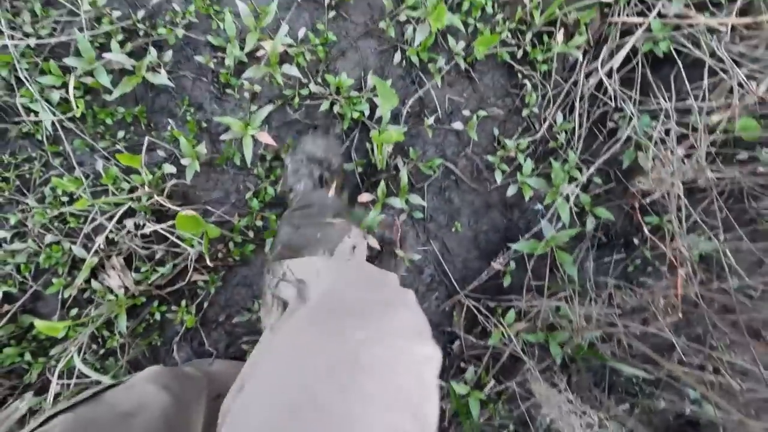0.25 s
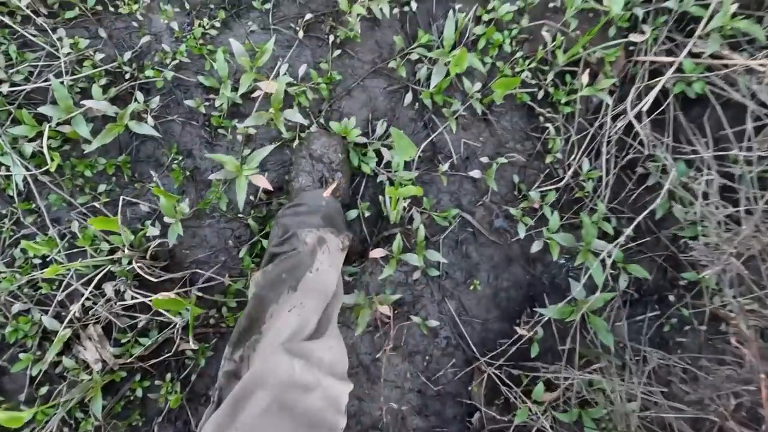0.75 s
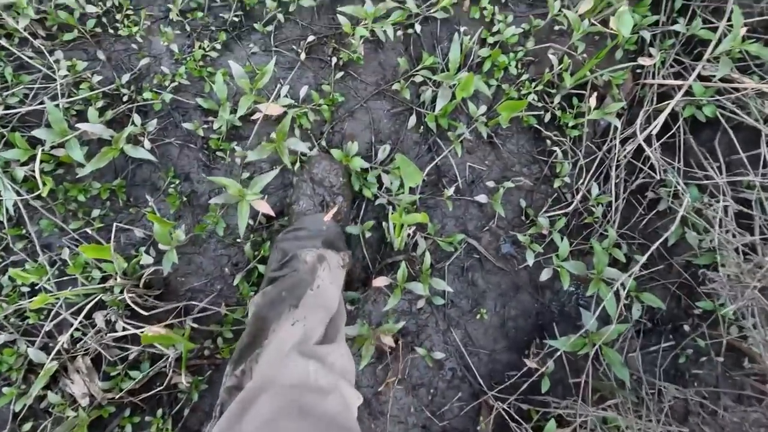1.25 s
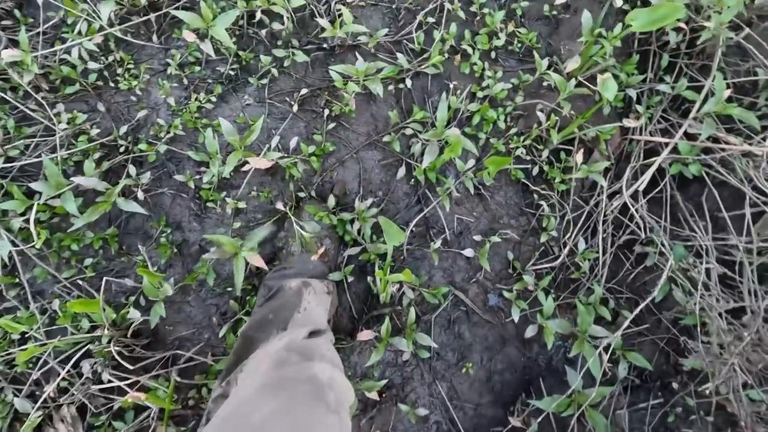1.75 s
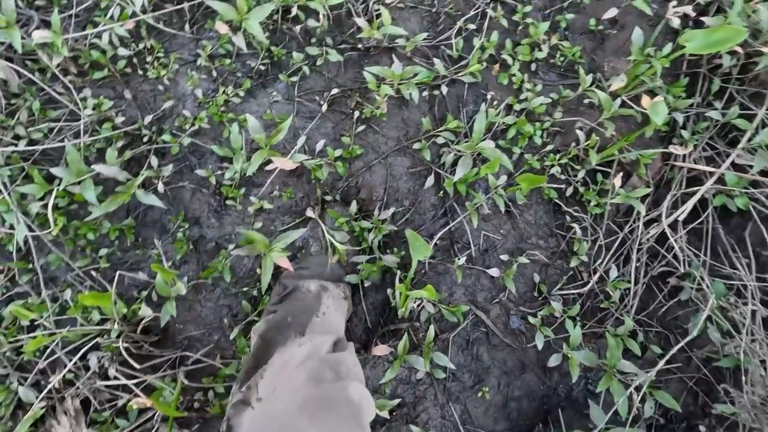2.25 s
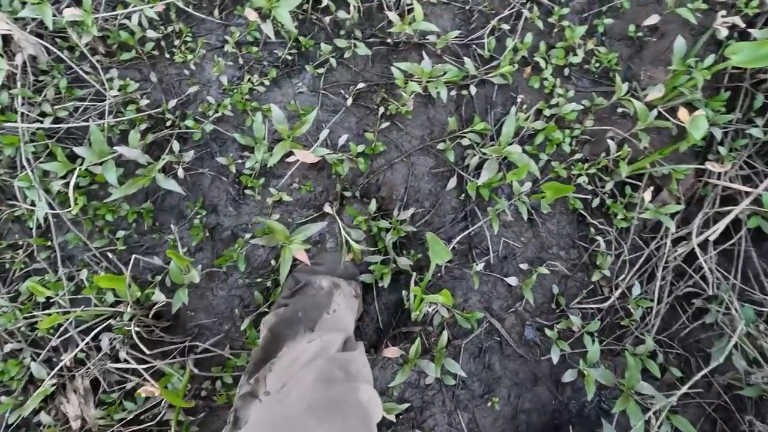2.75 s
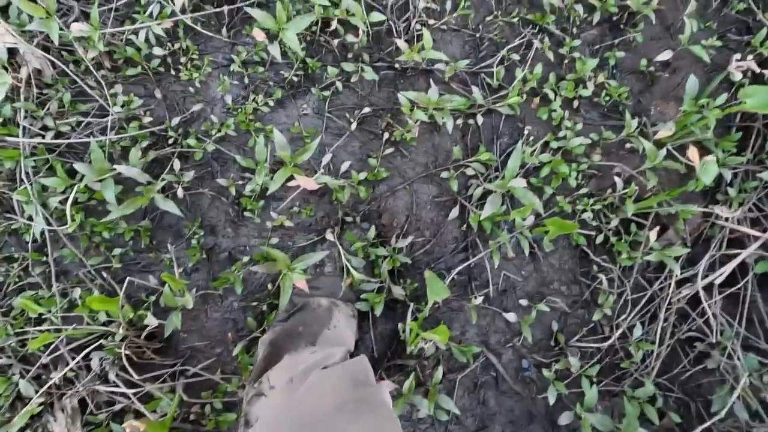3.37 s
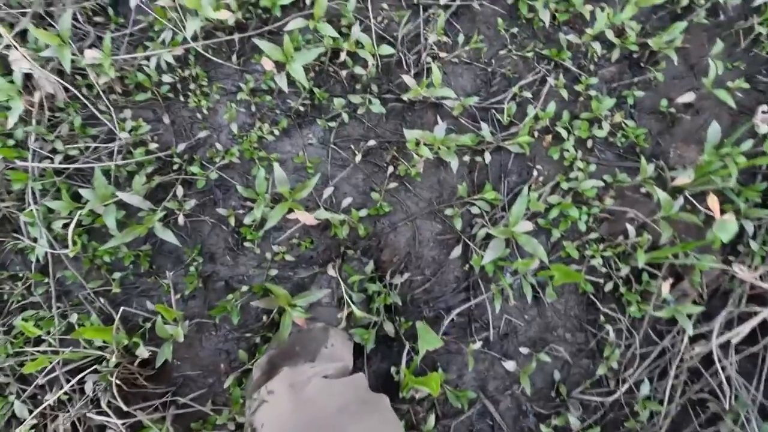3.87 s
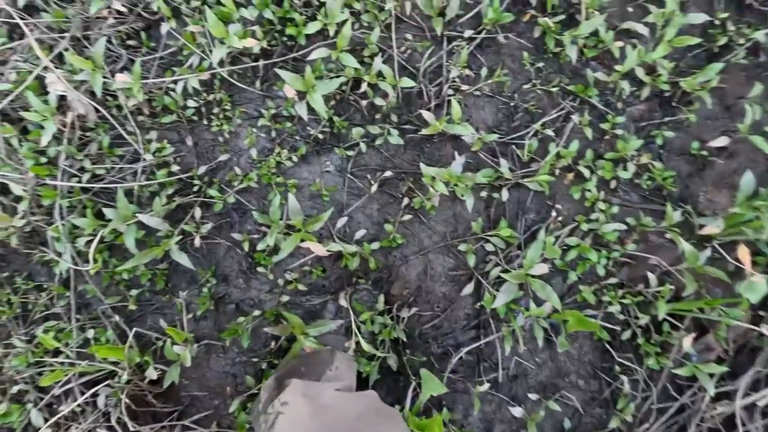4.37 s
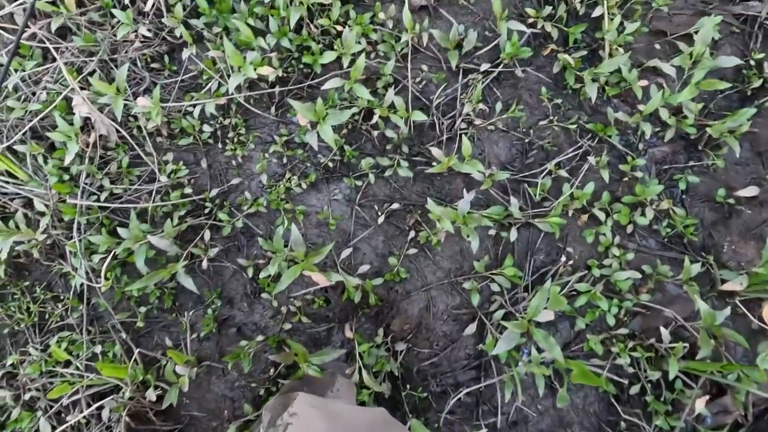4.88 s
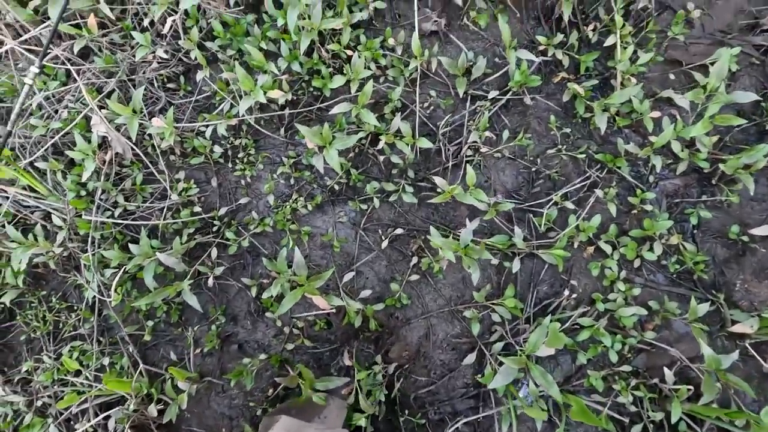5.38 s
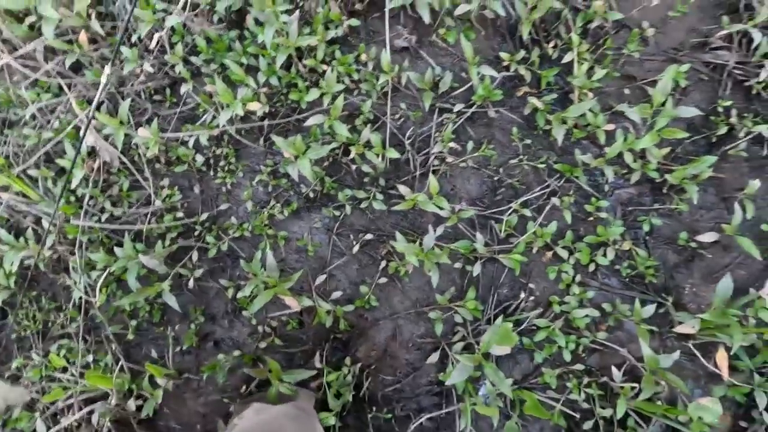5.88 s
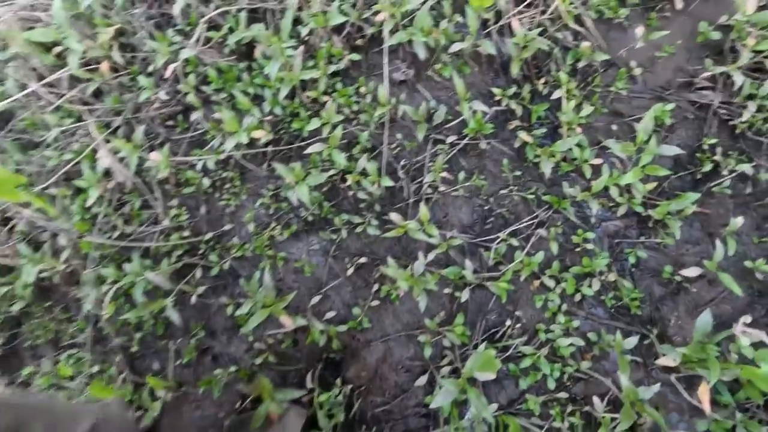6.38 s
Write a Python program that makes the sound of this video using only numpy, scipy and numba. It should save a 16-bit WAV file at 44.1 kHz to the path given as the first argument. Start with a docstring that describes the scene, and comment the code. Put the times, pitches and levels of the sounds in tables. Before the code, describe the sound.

Outdoors in a marsh, a boot presses into wet mud. After a near-quiet start, a burst of squelchy pops gives way to crackling bubbles and snapping stems. A short sharp squelch comes just after three seconds, then sparse pops and gurgles. Low wind buffeting and a wavering hum lie behind, with dull hand bumps on the handheld stereo phone.

```python
"""Wet marsh mud squelches and crackles under a slowly sinking boot: swarms of decaying sines and
pulsed band noise follow the load; runs of grains make squelching slips, gurgles and an airy rustle.
Single pockets pop, chirp and plop as sines of rising pitch; stems snap as clusters of short rings.
Behind them wind buffets two microphone ports as shaped noise, a low hum of narrow-band noise
wavers, and the hand bumps the phone as brief low cosines under a swelling envelope."""
import sys
import numpy as np
from scipy import signal
from scipy.fft import rfft, irfft
from scipy.io import wavfile
from scipy.ndimage import uniform_filter1d
from numba import njit

SR = 44100
rng = np.random.default_rng(int(sys.argv[2]) if len(sys.argv) > 2 else 0)


def bounce(signal):
    """Save signal as a 16-bit WAV file at the path given by the first command-line argument."""
    frames = np.transpose(np.atleast_2d(signal))
    limited = np.clip(frames, -1, 1)
    pcm = np.round(limited * 32767).astype(np.int16)
    wavfile.write(sys.argv[1], SR, pcm)


N = 292852

# All levels are those before the microphone response.
# Load on the mud, as the gain of the squelch: t/s, level/dB
MUD_LOAD = [(0, -60), (.3, -59), (.76, -43), (1.1, -49), (1.25, -51), (1.75, -50.5), (2.25, -55),
            (2.42, -58.5), (2.7, -57.5), (3.05, -56), (3.12, -38), (3.26, -50), (3.6, -57.5), (4.25, -56),
            (4.5, -54), (5.7, -54.5), (6.1, -57.5), (6.45, -54), (6.64, -52.5)]
# Runs of grains around one pitch (squelching slips, low gurgles and one airy rustle):
# t/s, length/s, level/dB, middle f/Hz, spread (+-)/octaves
GRAIN_RUNS = [(0.292, 0.44, -54, 507, 0.24), (0.631, 0.035, -40, 1820, 0.74),
              (0.752, 0.11, -41.5, 1500, 0.83), (0.845, 0.053, -30.5, 1620, 0.45),
              (0.887, 0.08, -38.5, 1126, 0.46), (1.199, 0.16, -48, 5630, 0.62),
              (1.698, 0.29, -61, 384, 0.62), (2.458, 0.017, -39, 1940, 1.54),
              (2.756, 0.053, -43, 2450, 1.95), (3.066, 0.025, -36, 1695, 1.59),
              (3.128, 0.02, -34, 2570, 2.3), (3.153, 0.12, -45.5, 4300, 0.98),
              (3.171, 0.025, -46.5, 637, 0.48), (3.537, 0.21, -52, 294, 0.21),
              (3.618, 0.36, -57.5, 9700, 0.3), (4.025, 0.71, -58, 346, 0.26),
              (5.605, 0.014, -39, 1190, 1.1), (5.645, 0.029, -42, 1670, 0.63),
              (5.801, 0.12, -52.5, 370, 0.23), (6.122, 0.05, -43.5, 1120, 0.35),
              (6.203, 0.083, -50, 328, 0.2), (6.331, 0.13, -47.5, 2970, 1.69),
              (6.429, 0.17, -50.5, 4840, 1.46)]
# Popping air pockets: t/s, level before the onset is shaped/dB, starting f/Hz
AIR_POPS = [(0.484, -29, 2240), (0.557, -24.5, 2360), (0.648, -25.5, 2500), (0.702, -20, 2450),
            (0.8, -21, 1290), (0.835, -20, 1880), (0.849, -22, 1060), (0.861, -14, 1200), (0.87, -19, 1820),
            (0.879, -16, 1220), (1.078, -20, 1300), (1.015, -33, 1800), (1.147, -25, 880),
            (1.185, -22, 3840), (1.226, -28, 4100), (1.32, -19.5, 5300), (1.35, -19.5, 3080),
            (1.406, -27, 1700), (1.499, -31, 5050), (1.555, -19, 4350), (1.631, -25.5, 3640),
            (1.733, -27.5, 2300), (1.782, -25, 4470), (1.803, -25.5, 3650), (1.812, -17, 6640),
            (1.823, -24.5, 2430), (1.873, -30.5, 3400), (1.929, -29.5, 2560), (1.985, -18, 2400),
            (2.108, -28, 2150), (2.466, -17, 1105), (2.566, -32, 1210), (2.757, -36, 880),
            (2.843, -32.5, 3540), (3.026, -31, 4770), (3.032, -31, 1260), (3.07, -15.5, 630),
            (3.129, -22.5, 970), (3.144, -20.5, 1100), (3.327, -32, 5900), (3.856, -35, 7150),
            (4.317, -31, 2660), (4.334, -32.5, 4840), (4.458, -32.5, 2900), (4.513, -34.5, 3430),
            (4.561, -30.5, 2070), (4.598, -27.5, 2300), (4.658, -29, 3970), (4.766, -32.5, 3620),
            (4.778, -31.5, 2470), (4.899, -20.5, 1050), (4.925, -30.5, 4040), (4.999, -32.5, 2180),
            (5.11, -23.5, 2380), (5.16, -34, 2540), (5.212, -32, 2420), (5.23, -27.5, 2360),
            (5.371, -30, 2000), (5.609, -26, 960), (5.616, -21, 1310), (5.638, -32, 1780),
            (5.689, -28.5, 4220), (5.815, -30.5, 2890), (5.85, -30.5, 4530), (6.296, -27, 2520),
            (6.336, -17, 1690), (6.446, -32.5, 2360), (6.466, -31, 2230)]
# Chirps and plops of single pockets, three high and three low:
# t/s, level before the onset is shaped/dB, starting f/Hz, decay/cycles, pitch climb/1
CHIRPS_AND_PLOPS = [(1.162, -19.5, 1380, 2, 0.53), (1.193, -27, 820, 6.4, 0.4),
                    (2.161, -36.5, 1780, 16, 0.32), (3.23, -33.5, 358, 2.4, 0.04),
                    (3.536, -32, 335, 2.2, 0.07), (6.418, -37, 340, 2.7, 0.054)]
# Snapping dry stems: t/s, level of the earliest splinters before the onset is shaped/dB
STEM_SNAPS = [(0.486, -40), (0.799, -41), (0.835, -40), (1.185, -27), (1.316, -33.5), (1.349, -20),
              (1.478, -32.5), (1.556, -33), (1.812, -25.5), (2.464, -32.5), (2.76, -33.5), (3.071, -27),
              (3.131, -22.5), (4.899, -26.5), (4.922, -42), (5.113, -37.5), (5.616, -35.5), (5.637, -31)]
# Bumps of the hand: t of the crest/s, level midway between the ports/dB, f/Hz, length/s
HAND_BUMPS = [(0.692, -38, 50, 0.071), (3.692, -29.5, 75.7, 0.061), (3.696, -22.5, 149, 0.014),
              (4.12, -36, 88.3, 0.06), (4.729, -32.5, 84, 0.019), (4.994, -31, 76, 0.011),
              (5.888, -33.5, 60.4, 0.024), (6.256, -28, 74.5, 0.016)]
# Gust strength, as the gain of the buffeting: t/s, level/dB
GUST_LEVEL = [(0, -46), (.5, -49.5), (1.4, -48.5), (2.3, -46.5), (3.2, -48.5), (4.1, -44), (4.8, -50),
              (6, -47.5), (6.64, -50.5)]
# Relative spectral density of the buffeting: f/Hz, level/dB (per Hz)
BUFFET_SPECTRUM = [(18, -16), (28, 10), (70, -5.5), (160, -5), (230, -13), (320, -26.5), (640, -27),
                   (1200, -51.5)]
# Gain of the hum: t/s, level/dB
HUM_LEVEL = [(0, -50), (1.14, -58.5), (1.5, -47.5), (1.9, -53), (2.65, -46.5), (3.6, -48), (3.98, -50.5),
             (4.2, -52.5), (4.9, -47), (5.9, -48.5), (6.64, -59.5)]
# Response of the microphone ports: f/Hz, level/dB
MIC_RESPONSE = [(300, 1.5), (800, -9), (1100, -5), (2200, -6.5), (4000, -2.5), (5300, -5.5), (7300, 3),
                (8900, -5.5), (11000, 1.5), (13500, -8), (16000, -20)]

# crackle gain at a squelch gain of -53 dB; dB of crackle per dB of squelch
CRACKLE_DB, CRACKLE_FOLLOWS = -62.5, 0.74
CRACKLE_CYCLES = 5.0  # decay in cycles, scaled grain by grain
DROPLET_DB, DROPLET_CYCLES = 1.5, 9.0  # level over the crackle grains; mean decay in cycles
RUN_GROWTH_DB = 1.5  # rise in level along a run
# decay of a 1 kHz pop at -30 dB in cycles; its power of pitch; its change with level
POP_CYCLES, CYCLES_PITCH_POWER, CYCLES_DB_PER_DB = 2.03, 0.57, -0.02
SPLINTER_S, SPLINTER_FADE_DB = 0.012, 8  # longest main delay; fade of the latest
TICK_DB, TICK_SPREAD_DB = -5.5, 1.5  # random twig ticks: level over the squelch gain, scatter
BUMP_RISE, BUMP_FALL = 0.28, 1.1  # shares of the length before and after the crest
HUM_HZ, HUM_WIDTH_HZ = 88.7, 9.0
PORT_LAG = 0.5  # samples by which the left port hears late
TOP_HZ = 16700


def mud():
    """Superposition: low pockets, high leaf crackle and droplets share gains set by the load."""
    squelch_db, = curves(MUD_LOAD)
    crackle_db = CRACKLE_DB + CRACKLE_FOLLOWS * (squelch_db + 53.0)
    squeeze = spurts(70, 0.003)  # drives low and high pores together
    pockets = swarm(count=2600, low_hz=898, high_hz=4080, spread_db=5.0, cycles=1.55, glide=0.047)
    low_ooze = seep(593, bands=5, shared=squeeze, shared_db=0.9, own_db=3.1, side=0.12)
    squelch = pockets + undb(-3.5) * low_ooze
    leaves = swarm(count=3500, low_hz=3130, high_hz=13640, spread_db=6.0,
                   cycles=CRACKLE_CYCLES, glide=0.0)
    high_ooze = seep(3370, bands=4, shared=squeeze, shared_db=14.0, own_db=0.99, side=0.12)
    crackle = leaves + undb(2.5) * high_ooze + undb(DROPLET_DB) * droplets()
    return undb(squelch_db) * squelch + undb(crackle_db) * crackle


def swarm(count, low_hz, high_hz, spread_db, cycles, glide):
    """Many independent grains add to a dense texture, mostly small, with a few large."""
    when, pitch, size, pan, decay = rng.random((count, 5)).T
    size_db = -spread_db * np.log(1.008 - size)
    pan_db = 0.34 + 17.0 * (2 * pan - 1)
    hz = low_hz * (high_hz / low_hz) ** pitch
    return unit(grains(when * N / SR, hz, size_db, pan_db, cycles * (0.29 + 2 * decay ** 3), glide))


def seep(low_hz, bands, shared, shared_db, own_db, side):
    """Amplitude modulation: water in pores hisses in half-octave bands, spurting together and alone."""
    out = 0
    for hz in low_hz * 2 ** (np.arange(bands) / 2):
        sos = signal.butter(2, (hz, hz * np.sqrt(2)), "bandpass", fs=SR, output="sos")
        mid, across = signal.sosfilt(sos, rng.standard_normal((2, N))) / np.sqrt(hz)
        flow = 1 + undb(shared_db) * shared + undb(own_db) * spurts(60, 0.012)
        out = out + flow * (mid + side * across * np.array([[1], [-1]]))
    return unit(out)


def spurts(rate, trail_s):
    """Impulses at random times excite an exponential relaxation: a fast start and a slow trail."""
    kicks = (rng.random(N) < rate / SR) * rng.exponential(size=N)
    return signal.lfilter([1], [1, -np.exp(-1 / (trail_s * SR))], kicks)


def droplets(count=600):
    """Lightly damped resonance: lone bubbles of like size ring clearly and glide upward."""
    when, pitch, size, pan, decay = rng.random((count, 5)).T
    size_db = -3 * np.log(1.03 - size)
    pan_db = 1 + 10 * (pan - 0.5)
    cycles = DROPLET_CYCLES * (0.5 + decay)
    return unit(grains(when * N / SR, 1400 * 5 ** pitch, size_db, pan_db, cycles, 0.045 * decay))


def grain_runs():
    """Superposition: runs of uneven grains around one pitch squelch, gurgle low or rustle airily."""
    out = 0
    for s, length, db, hz, octaves in GRAIN_RUNS:
        # grains of low runs come slower and lie to the right
        count = int(min(0.8 * hz, 2600) * length) + 2
        when, size, pitch, pan, decay = rng.random((400, 5))[:count].T
        spread_db, centre_db = (4.2, 1.5) if hz > 450 else (2.0, -4.5)
        size_db = db - spread_db * np.log(1.02 - size) + RUN_GROWTH_DB * when
        if length > 0.03:  # all but the shortest swell in and die away
            size_db = size_db + 20 * np.log10(np.sin(np.pi * np.sqrt(when)) + 0.1)
        pan_db = centre_db + 6.5 * (2 * pan - 1)
        pitches = hz * 2 ** (octaves * (2 * pitch - 1))
        out = out + grains(s + length * when, pitches, size_db, pan_db, 1.53 + 2.33 * decay ** 2, 0.097)
    return out


def pops():
    """Damped resonance: high-pitched pockets ring for more cycles, violent bursts for fewer."""
    s, db, hz = np.transpose(AIR_POPS)
    cycles = POP_CYCLES * (hz / 1000) ** CYCLES_PITCH_POWER * undb(CYCLES_DB_PER_DB * (db + 30))
    return grains(s, hz, db, 0.63 + 3.1 * rng.standard_normal(len(s)), cycles, 0.038)


def chirps_and_plops():
    """Damped resonance of single pockets, each with its own decay and pitch climb."""
    s, db, hz, cycles, climb = np.transpose(CHIRPS_AND_PLOPS)
    return grains(s, hz, db, -2.5 + 0 * s, cycles, climb)


def snaps(count=260):
    """Brittle fracture: loud stems, and small twigs that tick at random, louder under load."""
    when, size = rng.random((count, 2)).T
    s = when * N / SR
    tick_db = np.interp(s, *np.transpose(MUD_LOAD)) + TICK_DB - TICK_SPREAD_DB * np.log(1.02 - size)
    return splinters(*np.transpose(STEM_SNAPS)) + splinters(s, tick_db)


def splinters(s, db):
    """Fragmentation: a snap sheds 14 short rings, most at once and the late ones weaker."""
    u = rng.random((len(s), 15, 3))
    pan_db = np.repeat(4.6 + 12.0 * (2 * u[:, 14, 0] - 1), 14)
    u = u[:, :14]
    late = u[..., 0].ravel() ** 7
    thinness = ((np.arange(14) + u[..., 1]) / 14).ravel()  # every snap holds thick and thin splinters
    decay = u[..., 2].ravel()
    when = np.repeat(s, 14) + SPLINTER_S * late + 0.0007 * decay
    splinter_db = np.repeat(db, 14) - SPLINTER_FADE_DB * np.sqrt(late)
    return grains(when, 1500 * 9 ** thinness, splinter_db, pan_db, 1.4 + 0.65 * decay, 0.0)


def grains(s, hz, db, pan_db, cycles, glide):
    """Level difference places each grain between the ports; positive pan_db leans left."""
    hz = np.clip(hz, 20, 0.4 * SR)
    step = 2 * np.pi * hz / SR
    left, right = undb(db + pan_db / 2), undb(db - pan_db / 2)
    return ring(N, s * SR, step, np.maximum(cycles, 0.1) + 0 * s, glide + 0 * s, left, right)


@njit
def ring(n, start, step, cycles, glide, left, right):
    """Damped oscillation: a dying sine (step in rad/sample) whose pitch climbs if glide is set."""
    out = np.zeros((2, n))
    for k in range(len(start)):
        i, a, rise, phase, w = int(start[k]), 1., 1., 0., step[k]
        fade = np.exp(-step[k] / (2 * np.pi * cycles[k]))  # 1/e after the given cycles
        while a > .003 and i < n:
            wave = (a - rise) * np.sin(phase)
            out[0, i] += left[k] * wave
            out[1, i] += right[k] * wave
            phase += w
            w = min(w * (1 + glide[k] * (1 - fade)), 2.8)
            a *= fade
            rise *= fade ** 8  # the onset takes an eighth of the decay time
            i += 1
    return out


def bumps():
    """Impulsive excitation: a few low cycles swell fast and fade; higher ones lean more to the right."""
    out, side = np.zeros((2, N)), np.array([[-1], [1]])
    for s, db, hz, length in HAND_BUMPS:
        i = np.arange(int((s - 0.2) * SR), min(int((s + 0.2) * SR), N))
        t = i / SR - s
        width = length * np.where(t < 0, BUMP_RISE, BUMP_FALL)
        swell = np.exp(-(t / width) ** 2)
        out[:, i] += undb(db + side * hz / 40) * swell * np.cos(2 * np.pi * hz * t)
    return out


def wind():
    """Turbulent pressure: shaped noise, nearly alike at both ports, fluctuates with the gusts."""
    buffet_db, = curves(GUST_LEVEL)
    mid, across = colour(rng.standard_normal((2, N)), BUFFET_SPECTRUM)
    flutter = undb(3.04 * walk(13))
    buffet = unit(flutter * (mid + 0.15 * across * np.array([[1], [-1]])))
    return undb(buffet_db) * buffet * undb([[-1.2], [1.2]])  # stronger at the right port


def hum():
    """Resonant filtering of noise gives a narrow band whose amplitude wavers, equal at both ports."""
    hum_db, = curves(HUM_LEVEL)
    b, a = signal.iirpeak(HUM_HZ, HUM_HZ / HUM_WIDTH_HZ, SR)
    return undb(hum_db) * unit(signal.lfilter(b, a, rng.standard_normal(N)))


def walk(rate):
    """Moving averages: random levels held 1 / rate s are smoothed twice, which shrinks their spread."""
    k = int(SR / rate)
    held = np.repeat(rng.standard_normal(N // k + 1), k)
    return uniform_filter1d(uniform_filter1d(held, k), k)[:N]


def colour(x, points):
    """Minimum-phase filtering through (f/Hz, level/dB) points, by folding the cepstrum."""
    size = 4096
    hz, db = np.transpose(points)
    bins_hz = np.arange(size // 2 + 1) * SR / size
    log_gain = np.log(undb(np.interp(np.log(bins_hz + 1), np.log(hz), db)))
    cepstrum = irfft(log_gain)
    cepstrum[1:size // 2] *= 2
    cepstrum[size // 2 + 1:] = 0
    impulse = irfft(np.exp(rfft(cepstrum)))
    return signal.oaconvolve(np.atleast_2d(x), impulse[None], axes=1)[:, :N]


def undb(db):
    """Logarithmic scale: decibels to amplitude gain."""
    return 10 ** (np.asarray(db) / 20)


def unit(x):
    """Normalization to an rms value of 1."""
    return x / np.sqrt(np.mean(x ** 2))


def curves(table):
    """Linear interpolation of the columns after t/s, sample by sample."""
    s, *columns = np.transpose(table)
    return [np.interp(np.arange(N) / SR, s, c) for c in columns]


def scene():
    """Superposition of mud and stems at the feet with bumps, wind and hum."""
    return mud() + grain_runs() + pops() + chirps_and_plops() + snaps() + bumps() + wind() + hum()


def record(dry):
    """Reception: the left port hears a little late, the ports colour the treble, the top is cut."""
    taps = np.arange(-8, 9)
    window = np.hanning(len(taps) + 2)[1:-1]
    ports = []
    for channel, lag in zip(dry, (PORT_LAG / 2, -PORT_LAG / 2)):
        ports.append(np.convolve(channel, np.sinc(taps - lag) * window, "same"))  # fractional delay
    low_pass = signal.ellip(8, 0.2, 70, TOP_HZ, fs=SR, output="sos")
    return signal.sosfilt(low_pass, colour(np.array(ports), MIC_RESPONSE))


dry = scene()
out = record(dry)
bounce(out)
```